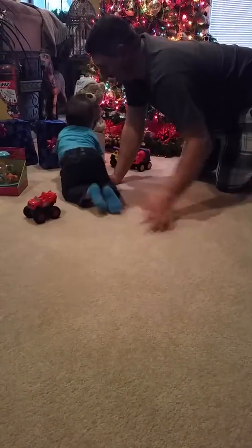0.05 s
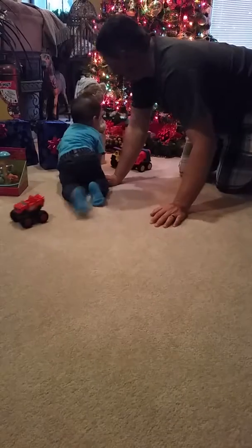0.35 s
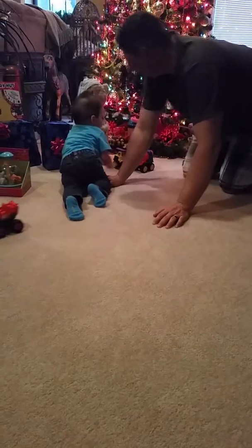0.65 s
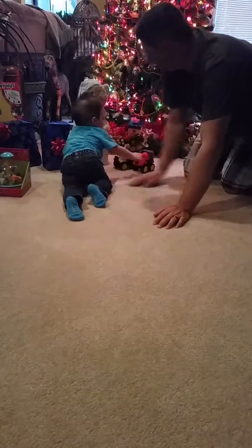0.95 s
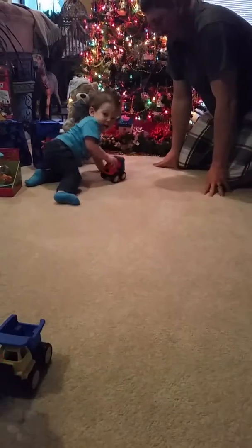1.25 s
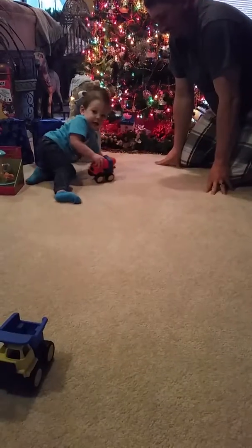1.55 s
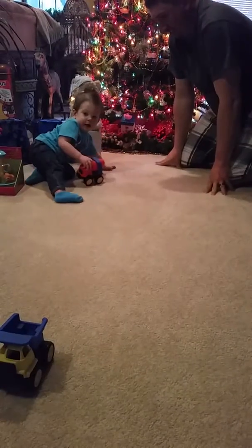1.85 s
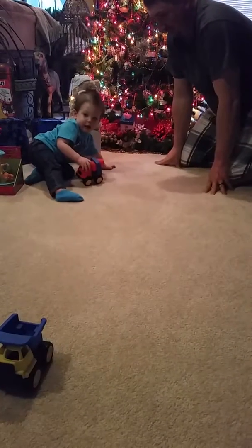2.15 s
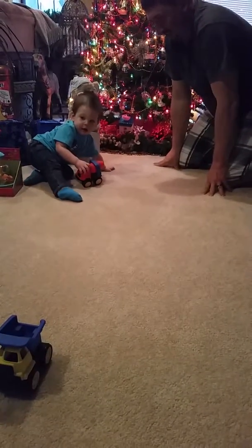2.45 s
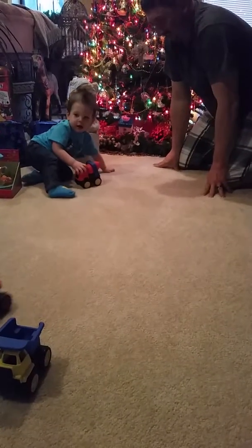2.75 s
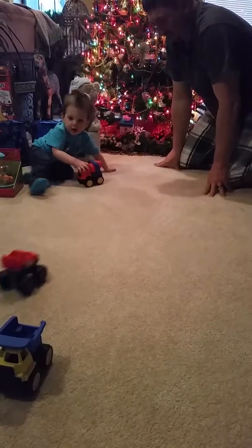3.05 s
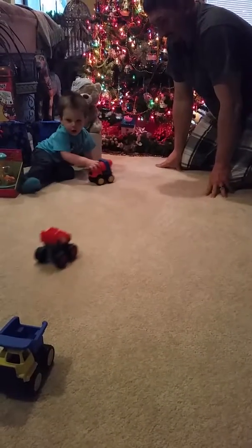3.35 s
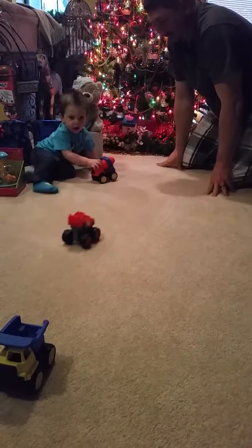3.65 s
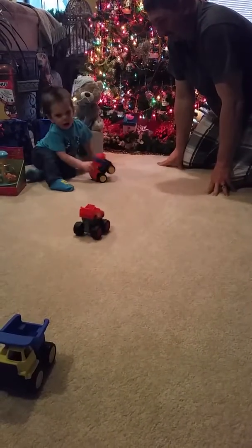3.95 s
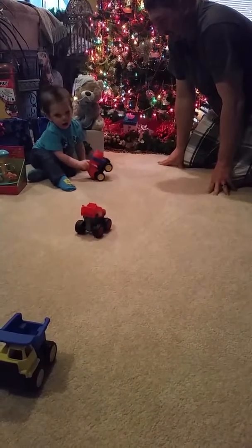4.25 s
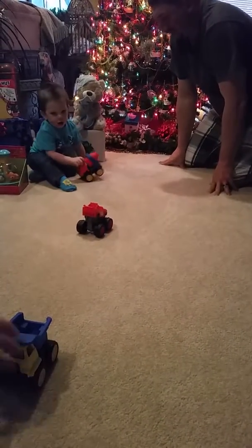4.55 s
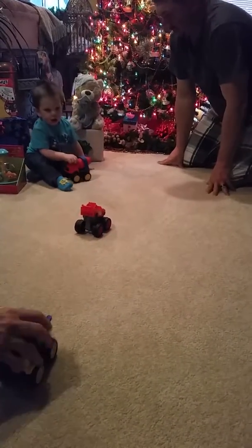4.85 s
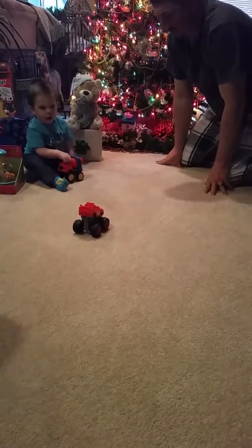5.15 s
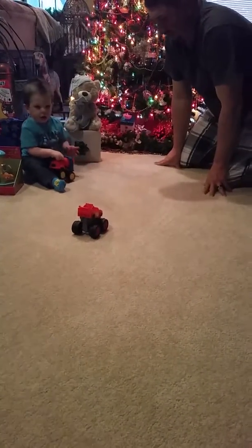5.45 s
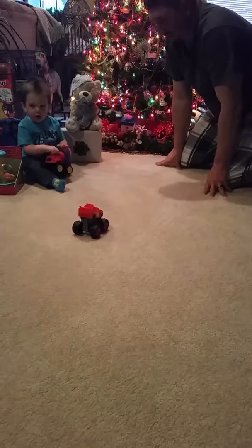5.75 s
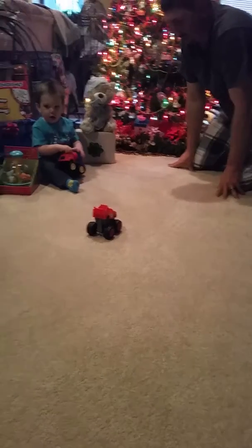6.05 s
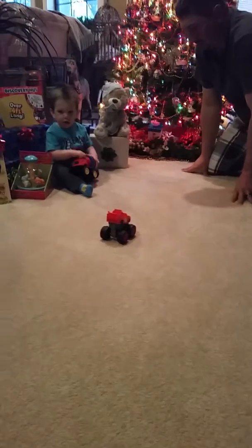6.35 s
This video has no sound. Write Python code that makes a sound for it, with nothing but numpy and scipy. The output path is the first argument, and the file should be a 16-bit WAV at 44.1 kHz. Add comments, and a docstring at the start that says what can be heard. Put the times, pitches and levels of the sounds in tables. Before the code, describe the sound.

In a living room with a low steady hum, a pull-back toy truck ratchets as it is wound, then rasps in a quick shove. Hollow plastic toys bump on carpet and loose axles click. The gears ratchet again and whirr in two short runs. Then a hollow dump truck is picked up close to the microphone, knocking and clacking at its hinge. Hands and clothes rub softly throughout.

```python
"""Plastic toy trucks on a living-room carpet; household machines hum, hands and clothes rub throughout. A pull-
back gearbox ratchets as it is wound (0.7 s), then rasps in a shove; at 1.1 s the rasp and all echoes break off
abruptly and a thin whine sets in. Hollow toys bump, loose axles click (2 s), the gearbox is wound again (2.7 s)
and whirrs in two short runs (3.2 s). A hand picks up a hollow dump truck, whose hinge clacks (4.1-5.6 s). The
microphone's two ports colour the treble very differently left and right."""
import sys
import numpy as np
from scipy import signal
from scipy.fft import rfft, irfft, next_fast_len
from scipy.io import wavfile
from scipy.ndimage import map_coordinates

SR = 44100
rng = np.random.default_rng(int(sys.argv[2]) if len(sys.argv) > 2 else 0)


def generate_wav(sig):
    """Save sig (samples, or channels by samples) to the path in sys.argv[1] as 16-bit PCM at SR."""
    pcm = np.round(np.clip(np.atleast_2d(sig).T, -1, 1) * 32767).astype(np.int16)
    wavfile.write(sys.argv[1], SR, pcm)


N = 283122
TIME_S = np.arange(N) / SR
BREAK_S = 1.1105  # shove and room tail stop, whine starts


def amp(db):
    """Decibels to gain."""
    return 10 ** (np.asarray(db) / 20)


def unit(x):
    """Scale to rms 1."""
    return x / np.sqrt(np.mean(x ** 2) + 1e-20)


def along(points, hz, column=1):
    """One column of a frequency table, read on a log axis."""
    table = np.transpose(points)
    return np.interp(np.log(hz + 1), np.log(table[0] + 1), table[column])


def curves(rows):
    """Per-sample curve of each column after the time."""
    times_s, *columns = np.transpose(rows)
    return [np.interp(TIME_S, times_s, column) for column in columns]


def wobble(rate_hz):
    """Smooth random curve, rate_hz knots a second."""
    return map_coordinates(rng.standard_normal(4096), [TIME_S * rate_hz], mode="wrap")


def filtered(x, response):
    """Apply a gain given as a function of frequency."""
    size = next_fast_len(N + SR // 2)
    return irfft(rfft(x, size) * response(np.fft.rfftfreq(size, 1 / SR)), size)[..., :N]


def add(track, start_s, sound):
    """Mix a sound into a track."""
    part = track[..., round(start_s * SR):][..., :sound.shape[-1]]
    part += sound[..., :part.shape[-1]]


def through(x, response):
    """Convolve with a pair of impulse responses."""
    return signal.fftconvolve(np.atleast_2d(x), response, axes=1)[:, :N]


def body(colour, modes=(), lag_s=.0001, size=2048):
    """Impulse responses of a plastic body at the two ports, mean energy 1; the right one lags."""
    hz = np.fft.rfftfreq(size, 1 / SR)
    db = np.array([along(colour, hz, 1), along(colour, hz, 2)])
    db += sum(lift / (1 + (2 * (hz - centre) / width) ** 2) for centre, width, lift in modes)
    cepstrum = irfft(np.log(amp(db)))
    cepstrum[:, 1:size // 2] *= 2  # fold to minimum phase
    cepstrum[:, size // 2 + 1:] = 0
    response = irfft(np.exp(rfft(cepstrum) - 2j * np.pi * hz * [[0], [lag_s]]))
    return unit(response[:, :size // 2]) / np.sqrt(size // 2)


def contact(rise_s, spread):
    """Brief chatter of plastic on plastic; spread weights the noise that differs between ports."""
    t = np.arange(SR // 20) / SR
    noise = rng.standard_normal((3, len(t)))
    swell = t / rise_s * np.exp(1 - t / rise_s)
    chatter = (noise[0] + spread * noise[1:]) * swell
    return chatter * np.linalg.norm(swell) / np.linalg.norm(chatter, axis=1, keepdims=True)


def gear_teeth(moves, decay, scatter_db, spread):
    """Each meshing tooth releases a decaying noise burst of random strength."""
    out = np.zeros((2, N))
    for rows in moves:
        level_db, rate_hz = curves(rows)
        teeth = np.cumsum(rate_hz) / SR
        strength = amp(scatter_db * rng.standard_normal(8192))[teeth.astype(int) % 8192]
        noise = rng.standard_normal((3, N))
        bursts = (noise[0] + spread * noise[1:]) * strength * np.exp(-decay * (teeth % 1))
        moving = (TIME_S > rows[0][0]) & (TIME_S < rows[-1][0])
        out += moving * amp(level_db) * unit(bursts)
    return out


# (frequency [Hz], T60 [s])
ROOM_DECAY = [(200, 0.14), (1200, 0.31), (5000, 0.28), (12000, 0.22), (16000, 0.12)]
def in_room(dry, wet_db, onset_s=.0045):
    """Direct sound plus room tail; the tail of anything before BREAK_S stops there."""
    hz, t, spectra = signal.stft(rng.standard_normal((2, SR // 2)), SR, nperseg=256)
    decay = amp(-60 * t / along(ROOM_DECAY, hz)[:, None])
    tail = signal.istft(spectra * decay * (1 - np.exp(-t / onset_s)), SR, nperseg=256)[1]
    tail = amp(wet_db) * tail / np.linalg.norm(tail[0])
    before = TIME_S < BREAK_S
    return dry + before * through(dry * before, tail) + through(dry * ~before, tail)


# (frequency [Hz], left [dB], right [dB])
PORT_GAINS = [(1000, 4, -1), (2800, 3, 3), (4500, 8, -14), (7400, 5.5, -10), (9500, 5, -7.5),
              (12050, -7, 2), (14500, -3, -3)]
def at_ports(x):
    """Each port colours sound from the floor differently."""
    return filtered(x, lambda hz: amp([along(PORT_GAINS, hz, 1), along(PORT_GAINS, hz, 2)]))


# (frequency [Hz], left-right coherence [0-1])
COHERENCE = [(120, 0.99), (300, 0.78), (1000, 0.17), (2500, 0.056), (12000, 0.0093)]
def diffuse(colour):
    """Diffuse stereo noise, rms 1."""
    def mid_side_gains(hz):
        angle = np.arccos(along(COHERENCE, hz)) / 2
        return amp(along(colour, hz)) * np.array([np.cos(angle), np.sin(angle)])
    mid, side = filtered(rng.standard_normal((2, N)), mid_side_gains)
    return unit(np.array([mid + side, mid - side]))


# hum partials: (frequency [Hz], level [dB])
HUM_TONES = [(59, -81), (73.5, -51.5), (117.6, -102), (120, -44), (179, -61.5), (353, -66)]
# noise spectra: (frequency [Hz], density [dB])
RUMBLE_COLOUR = [(20, -5.5), (46, -16), (58, -2), (90, 2), (125, 2), (165, -10), (240, -14.5), (340, -15.5),
                 (480, -25), (1000, -32), (2000, -47.5), (4000, -62)]
HISS_COLOUR = [(500, -10.5), (2000, 7), (3200, -9), (4350, 11.5), (5200, -14), (7000, -33), (9000, -3),
               (11800, 7), (13200, 4), (15200, -0.5)]
WHINE_COLOUR = [(13300, -65), (13580, -13.5), (13650, 6), (13720, -15), (14000, -69)]
def house(rumble_db, hiss_db, whine_db):
    """Motors and mains hum unsteadily over air rumble, faint hiss and a thin electrical whine."""
    hum = np.zeros(N)
    for hz, db in HUM_TONES:
        gain = np.sqrt(2) * amp(db + 1.9 * wobble(3.056))
        hum += gain * np.sin(2 * np.pi * hz * TIME_S + .34 * wobble(2.365))
    whine = amp(whine_db) * diffuse(WHINE_COLOUR) * (TIME_S > BREAK_S)
    rumble = amp(rumble_db) * diffuse(RUMBLE_COLOUR)
    hiss = amp(hiss_db) * diffuse(HISS_COLOUR)
    return amp([[-.4], [.4]]) * (hum + rumble) + hiss + whine


def rub_envelope(rows, sharpness, rest_db):
    """Each rub swells, then fades more slowly to a resting rustle."""
    power = amp(rest_db) ** 2
    for start_s, rise_s, db in rows:
        age = np.maximum(TIME_S - start_s, 0) / rise_s
        power = power + (amp(db) * (age * np.exp(1 - age)) ** sharpness) ** 2
    return np.sqrt(power)


# (start [s], rise [s], level [dB])
SCUFF_RUBS = [(.205, 0.022, -60.5), (1.105, 0.013, -50), (1.15, 0.096, -61.5), (2.1, .16, -70),
              (2.95, 0.24, -60), (3.56, 0.052, -59), (4.145, 0.026, -51.5), (4.37, 0.049, -64),
              (4.76, 0.059, -61), (4.89, 0.1, -61), (5.27, 0.22, -69), (5.905, 0.056, -60.5),
              (6.1, 0.088, -66)]
# (frequency [Hz], density [dB])
SCUFF_COLOUR = [(400, -18), (700, -3.5), (1000, -3), (1280, -1), (1550, -5), (3000, -9.5), (4500, -11.5),
                (6500, -23), (14000, -12.5)]
def scuffs(gain_db):
    """Hands and wheels scuff plastic in tiny uneven slips."""
    friction = unit(diffuse(SCUFF_COLOUR) * amp(1.5 * wobble(140) + .42 * wobble(28)))
    return at_ports(amp(gain_db) * rub_envelope(SCUFF_RUBS, sharpness=.73, rest_db=-77) * friction)


# (start [s], rise [s], level [dB])
BRUSH_RUBS = [(.18, 0.16, -72), (1.13, 0.18, -57), (2.2, 0.13, -62.5), (3.3, 0.46, -63),
              (4.38, 0.073, -55.5), (4.69, 0.038, -55.5), (4.88, 0.19, -60.5), (5.07, 0.015, -52),
              (5.25, 0.095, -52.5), (5.91, 0.027, -58), (6.05, 0.065, -60.5), (6.24, 0.069, -54)]
# (frequency [Hz], density [dB])
PILE_COLOUR = [(3000, -11), (4500, -11.5), (6800, -19.5), (10000, -11), (12000, 1), (13300, -14),
               (15500, -5)]
def brushes(gain_db):
    """Clothes brush the carpet pile."""
    friction = unit(diffuse(PILE_COLOUR) * amp(1.9 * wobble(200)))
    return at_ports(amp(gain_db) * rub_envelope(BRUSH_RUBS, sharpness=1.1, rest_db=-69.5) * friction)


# (start [s], rise [s], level [dB])
DRAG_RUBS = [(4.72, 0.068, -64), (4.9, 0.043, -61), (5.9, 0.047, -59), (6.0, 0.057, -63)]
# (frequency [Hz], density [dB])
CAVITY_COLOUR = [(800, -32), (1130, -3), (1290, 4), (1430, -2), (1900, -43)]
def drags(gain_db):
    """A hand drags over a hollow toy and excites its cavity."""
    friction = unit(diffuse(CAVITY_COLOUR) * amp(2.8 * wobble(45)))
    return at_ports(amp(gain_db) * rub_envelope(DRAG_RUBS, sharpness=.73, rest_db=-83) * friction)


# (time [s], level [dB], cavity ring [Hz])
TOY_BUMPS = [(0.991, -40, 1000), (1.358, -44, 1080), (1.569, -35, 1123), (1.795, -44, 1140),
             (1.891, -55, 1090), (2.128, -39.5, 1100), (3.617, -44, 1140), (6.151, -44.5, 1134),
             (6.196, -46, 1210)]
def bumps(gain_db, width_hz, wall_db, tap_db, carpet_cutoff_hz=3000):
    """Hollow toys bump on carpet: a dull tap, a cavity ring and a lower wall mode."""
    out = np.zeros((2, N))
    band = signal.butter(1, [500, 2500], "band", fs=SR)
    for time_s, db, hz in TOY_BUMPS:
        blow = contact(rise_s=.0016, spread=.42)
        cavity = signal.lfilter(*signal.iirpeak(hz, hz / width_hz, SR), blow)
        walls = signal.lfilter(*signal.iirpeak(.52 * hz, 4, SR), blow)
        tap = signal.lfilter(*signal.butter(1, carpet_cutoff_hz, fs=SR), blow)
        ring = signal.lfilter(*band, cavity - amp(wall_db) * walls + amp(tap_db) * tap)
        add(out, time_s, amp(db + gain_db) * ring / np.abs(ring).max())
    return at_ports(in_room(out, wet_db=-3.5))


# (time [s], level [dB], ring [Hz])
PART_TICKS = [(4.080, -40, 2950), (4.168, -37, 10600), (4.191, -31, 12000), (4.299, -34.5, 10730),
              (4.406, -43, 11900)]
# (frequency [Hz], left [dB], right [dB])
PART_COLOUR = [(996, -26, -17), (3060, -3.5, -10), (6250, -6, -25), (8230, -13, -26), (11150, -12, 3),
               (12100, -16.5, -4), (15000, -16, -15)]
def ticks(width_hz, lift_db):
    """Small parts tick as a toy is turned over, each with its own resonance."""
    out = np.zeros((2, N))
    for time_s, db, hz in PART_TICKS:
        part = body(PART_COLOUR, [(hz, width_hz, lift_db)])
        add(out, time_s + .0005, amp(db) * through(contact(rise_s=.00042, spread=.79), part))
    return in_room(out, wet_db=-8)


# (time [s], level [dB], cutoff [Hz], rebound re blow [dB])
DUMP_CLACKS = [(4.152, -37, 3000, -4), (4.712, -21, 1380, -10), (4.789, -40, 1800, -18),
               (4.815, -33, 1500, -0.5), (4.92, -36.5, 2490, -4), (5.078, -36, 2500, -15),
               (5.106, -35, 2000, -19), (5.205, -38.5, 9000, -23.5), (5.283, -28.5, 6300, -6.5),
               (5.293, -27.5, 4200, -22), (5.306, -22.5, 8150, -16), (5.339, -24, 5200, -18),
               (5.436, -18, 4830, -6.5), (5.465, -25.5, 3500, -13), (5.599, -38, 4000, -10)]
# hollow bed: (frequency [Hz], left [dB], right [dB])
BED_COLOUR = [(195, -17, -32), (460, 0.5, -2.5), (860, -1.5, -4.5), (1290, -1, 0), (1710, 2.5, -8),
              (2640, -7, -7), (3520, 1, -4.5), (5630, -4, -21), (6470, -9.5, -33), (12400, -6.5, 4.5),
              (15600, -23, -8.5)]
# (frequency [Hz], width [Hz], lift [dB])
BED_RESONANCES = [(752, 140, 8.5), (1152, 89, 9.5), (1310, 87, 5), (2600, 230, 3.5)]
def dump_truck(gain_db, rattle_s=.0052, graze_db=-3.5):
    """Fingers knock dully on the bed, the loose hinge clacks; each hit is graze, blow, rebound."""
    blows = np.zeros((2, N))
    for time_s, db, cutoff_hz, rebound_db in DUMP_CLACKS:
        softening = signal.butter(1, cutoff_hz, fs=SR)
        for delay_s, part_db in [(-rattle_s, rebound_db + graze_db), (0, 0), (rattle_s, rebound_db)]:
            blow = signal.lfilter(*softening, contact(rise_s=.0014, spread=.93))
            add(blows, time_s + delay_s, amp(db + part_db + gain_db) * blow)
    return in_room(through(blows, body(BED_COLOUR, BED_RESONANCES, lag_s=.00005)), wet_db=-6.5)


# (time [s], level [dB], tooth rate [Hz])
AXLE_GRATE = [(2.006, -46, 380), (2.04, -32, 480), (2.057, -36, 550), (2.07, -34, 530), (2.095, -46, 320),
              (2.115, -56, 320)]
# (time [s], level [dB])
AXLE_CLICKS = [(2.004, -35.5), (2.0124, -23), (2.026, -32), (2.059, -12), (2.066, -25), (2.127, -19.5),
               (3.147, -28), (3.395, -28.5), (3.404, -30)]
# (frequency [Hz], left [dB], right [dB])
CHASSIS_COLOUR = [(250, -37, -40), (534, -22, -29.5), (1130, -11, -12), (1480, -17.5, -24.5),
                  (3680, -16.5, -17.5), (4140, -3.5, -27), (4900, -14.5, -33), (9150, -10.5, -28.5),
                  (12000, -14.5, -1.5), (13900, -26, -11.5), (16500, -5.5, -39)]
def chassis(click_db):
    """The small truck's loose axles click, and grate as it is pressed down."""
    blows = gear_teeth([AXLE_GRATE], decay=.99, scatter_db=6, spread=.48)
    for time_s, db in AXLE_CLICKS:
        add(blows, time_s + .0005, amp(db + click_db) * contact(rise_s=.0011, spread=.87))
    return in_room(through(blows, body(CHASSIS_COLOUR)), wet_db=-4)


# per run: (time [s], level [dB], tooth rate [Hz])
GEAR_RUNS = [
    [(3.174, -25.5, 490), (3.19, -26.5, 880), (3.25, -26, 570), (3.305, -32.5, 760), (3.335, -60, 360)],
    [(3.472, -38.5, 550), (3.53, -26.5, 690), (3.58, -30.5, 740), (3.625, -34, 690), (3.648, -56, 200)],
]
# free gears: (frequency [Hz], left [dB], right [dB])
FREE_COLOUR = [(358, -45, -38), (700, -23.5, -27), (1720, -24.5, -26.5), (2800, -14.5, -18.5),
               (3620, -22.5, -26), (4600, -6, -24), (5600, -9, -26), (7980, -12.5, -33), (9140, -2, -33),
               (9670, -10.5, -10.5), (12260, -9, 3.5), (14100, -16, -27), (14300, -7, 2.5),
               (15700, -9.5, -18)]
# (time [s], level [dB])
AXLE_SONG = [(3.46, -100), (3.5, -53.5), (3.59, -57), (3.615, -35), (3.635, -43), (3.69, -100)]
TYRE_DRUMMING = [(3.0, -62), (3.17, -51), (3.3, -47), (3.45, -50.5), (3.65, -60), (3.9, -90)]
def running(tread_db):
    """The spring spins the gears, lumpy treads drum the floor, the axle sings as the truck stops."""
    whirr = through(gear_teeth(GEAR_RUNS, decay=.92, scatter_db=-1.5, spread=.59), body(FREE_COLOUR))
    axle_noise = diffuse([(7500, -56), (8700, -7), (9100, -5), (9500, -3), (11000, -50)])
    singing = amp(curves(AXLE_SONG)[0]) * amp([[2], [-12]]) * axle_noise
    tyre_noise = diffuse([(100, -16), (230, 7), (380, -2.5), (650, -5), (1500, -30)])
    drumming = amp(curves(TYRE_DRUMMING)[0] + tread_db * wobble(45)) * tyre_noise
    return in_room(whirr + singing, wet_db=-5) + drumming


# (click gap [s], left minus right [dB])
PAN_BY_GAP = [(.011, -3.5), (.017, 6.5)]
def pawl_clicks(start_s, count, gaps_s, first_db, last_db, catch_db=4, catch_pan_db=-2.5):
    """Time, level and pan of each click: strength grows with spring tension; the last one catches."""
    gaps = np.interp(np.linspace(0, 1, count - 1), [0, .5, 1], gaps_s)
    db = last_db + (first_db - last_db) * np.linspace(1, 0, count) ** 3.04  # levels off early
    db[-1] += catch_db
    pan_db = np.append(np.interp(gaps, *np.transpose(PAN_BY_GAP)), catch_pan_db)
    return zip(start_s + np.append(0, np.cumsum(gaps)), db, pan_db)


# per push: (time [s], level [dB], tooth rate [Hz])
GEAR_WINDS = [
    [(.67, -46, 380), (.73, -29.5, 530), (.82, -25, 350), (.85, -42, 390), (.866, -24, 220)],
    [(2.737, -38, 440), (2.80, -40, 390), (2.92, -24, 410), (2.956, -38, 360)],
]
# (start [s], clicks, first gap [s], middle gap [s], last gap [s], first [dB], last [dB], ring [Hz])
PAWL_STROKES = [(.6768, 13, .0041, .0158, .0192, -26.5, -14, 5000),
                (2.7459, 13, .005, .0135, .0275, -26, -12.5, 5200),
                (3.177, 20, .0058, .0082, .0054, -16, -18, 4550)]
# wound gears: (frequency [Hz], left [dB], right [dB])
WOUND_COLOUR = [(400, -56, -53), (630, -33, -32), (743, -16.5, -21), (1710, -28.5, -32.5),
                (3000, -14, -15.5), (3930, -22, -36), (4240, -5.5, -22), (5200, -5.5, -25),
                (6830, -11, -27.5), (9800, -11.5, -23), (10100, -9, -9), (11950, -15, -2),
                (13100, -34, -2.5), (14700, -5, -5.5)]
# (frequency [Hz], width [Hz], lift [dB])
GEAR_RESONANCES = [(1087, 106, 9), (4480, 160, 4.5), (5100, 200, 2), (11760, 300, 5)]
SHELL_RESONANCES = [(1060, 480, 4.5), (3870, 250, 2.5)]
def ratchet(click_db, buzz_db, ring_width_hz=460, ring_lift_db=4.5):
    """The pawl snaps over its wheel, rings and knocks the shell, above the buzz of winding gears."""
    teeth = gear_teeth(GEAR_WINDS, decay=1.9, scatter_db=-.5, spread=.32)
    out = amp(buzz_db) * through(teeth, body(WOUND_COLOUR, GEAR_RESONANCES))
    common = contact(rise_s=.001, spread=.39)  # all clicks sound partly alike
    for start_s, count, *gaps_s, first_db, last_db, ring_hz in PAWL_STROKES:
        snaps = np.zeros((2, N))
        for time_s, db, pan_db in pawl_clicks(start_s, count, gaps_s, first_db, last_db):
            click = (common + contact(rise_s=.001, spread=.63)) / np.sqrt(2)
            pan = amp([[pan_db / 2], [-pan_db / 2]])
            add(snaps, time_s + .0005, amp(db + click_db) * pan * click)
        modes = GEAR_RESONANCES + SHELL_RESONANCES + [(ring_hz, ring_width_hz, ring_lift_db)]
        out += through(snaps, body(WOUND_COLOUR, modes))
    return in_room(out, wet_db=-5.5)


# (time [s], level [dB], tooth rate [Hz])
GEAR_SHOVE = [(1.044, -33.5, 316), (1.058, -28, 310), (1.064, -22, 370), (1.083, -21, 380),
              (1.111, -27, 300)]
# gripped gearbox: (frequency [Hz], width [Hz], lift [dB])
GRIPPED_RESONANCES = [(2470, 91, 10), (4560, 530, 9), (7420, 480, 10.5), (11550, 1500, 7)]
def shove():
    """A quick push forward spins the wound gears into a rasp; at BREAK_S the rasp and every echo stop abruptly."""
    teeth = gear_teeth([GEAR_SHOVE], decay=.63, scatter_db=-.8, spread=.3)
    rasp = through(teeth, body(WOUND_COLOUR, GRIPPED_RESONANCES))
    return (TIME_S < BREAK_S) * in_room(rasp, wet_db=-6.5)


def scene():
    """Gearbox, knocks and rubbing over the household background."""
    gearbox = ratchet(click_db=-2.4, buzz_db=-2) + shove() + running(tread_db=3)
    knocks = chassis(click_db=-3) + dump_truck(gain_db=-3.5)
    knocks += bumps(gain_db=2.5, width_hz=77, wall_db=-6.5, tap_db=-22.5)
    knocks += ticks(width_hz=540, lift_db=12.5)
    rubbing = scuffs(gain_db=1) + brushes(gain_db=1) + drags(gain_db=2.5)
    return gearbox + knocks + rubbing + house(rumble_db=-43.5, hiss_db=-69.5, whine_db=-74.5)


def record(dry):
    """The microphone thins the deepest bass and passes nothing above its band limit."""
    low_hz, top_hz = 20, 15900
    return filtered(dry, lambda hz: hz / np.hypot(hz, low_hz) * (.5 - .5 * np.tanh((hz - top_hz) / 80)))


dry = scene()
out = record(dry)
generate_wav(out)
```